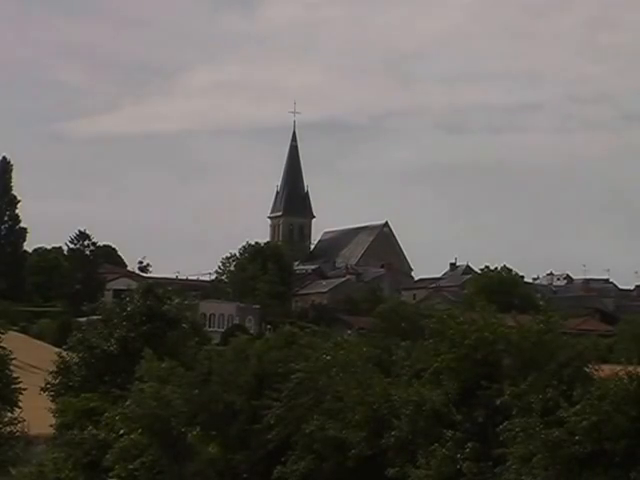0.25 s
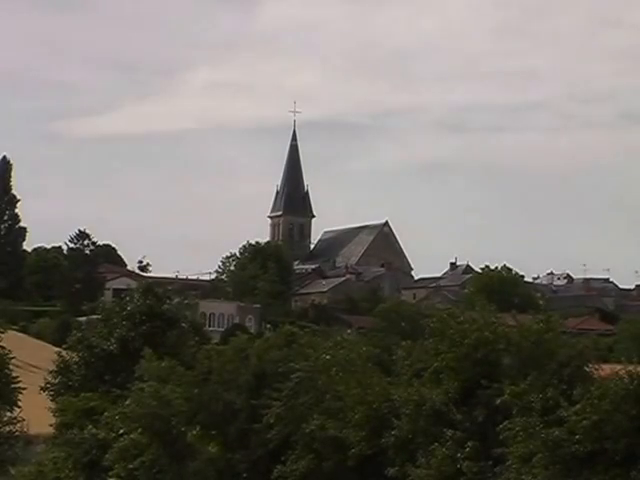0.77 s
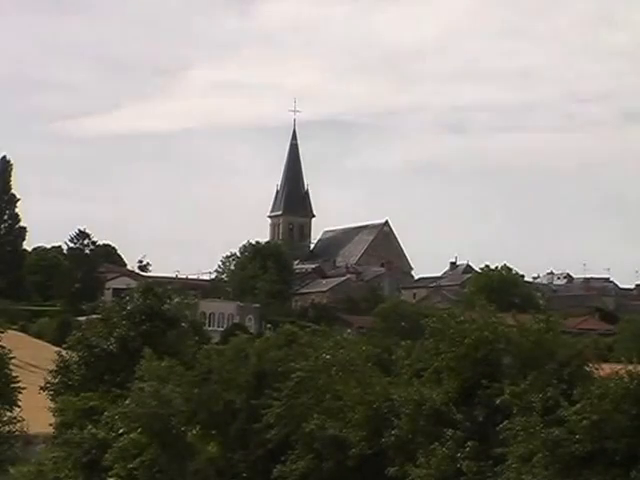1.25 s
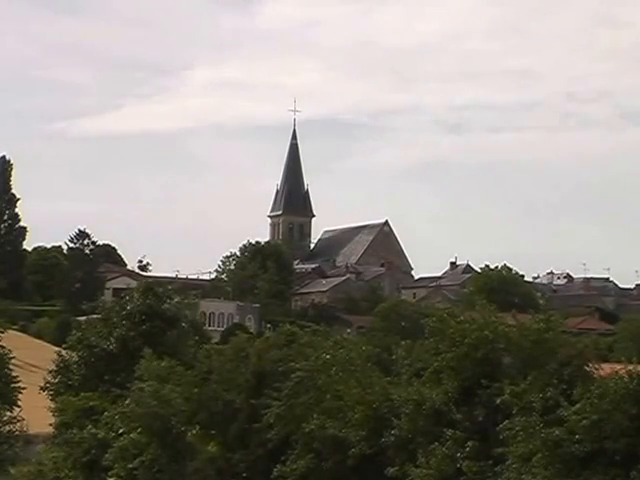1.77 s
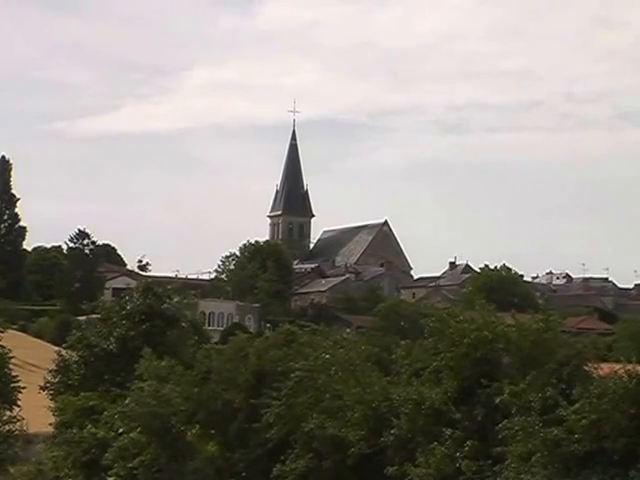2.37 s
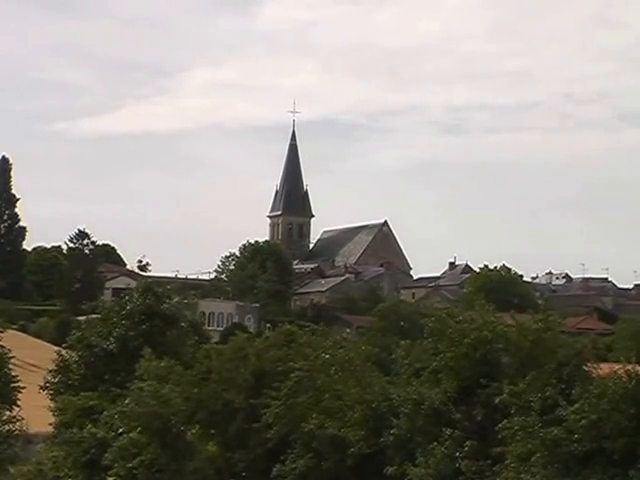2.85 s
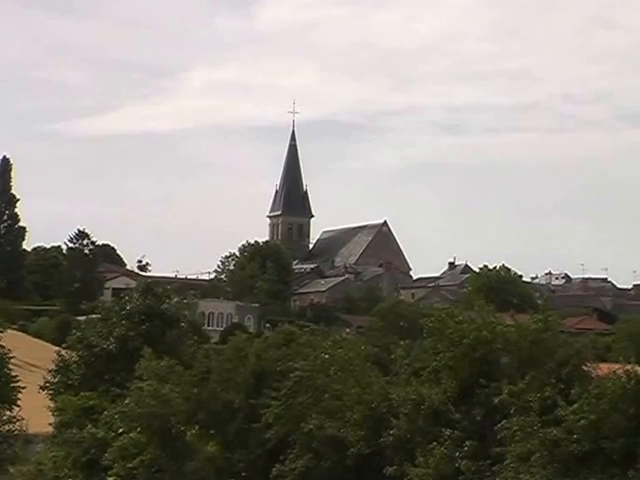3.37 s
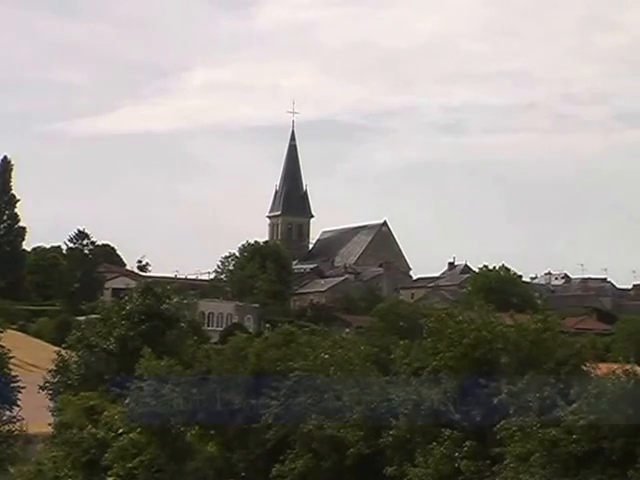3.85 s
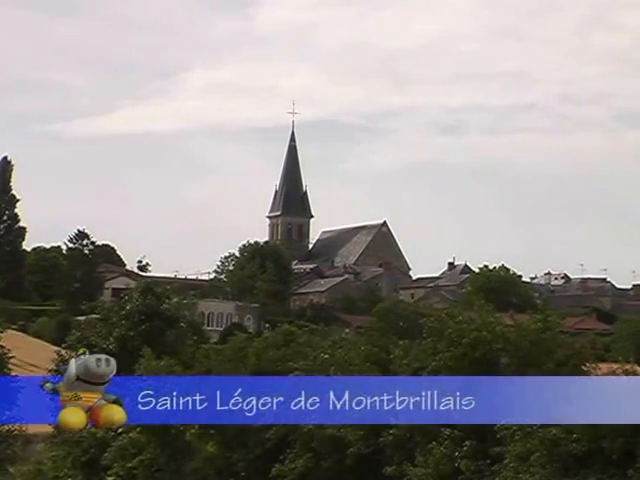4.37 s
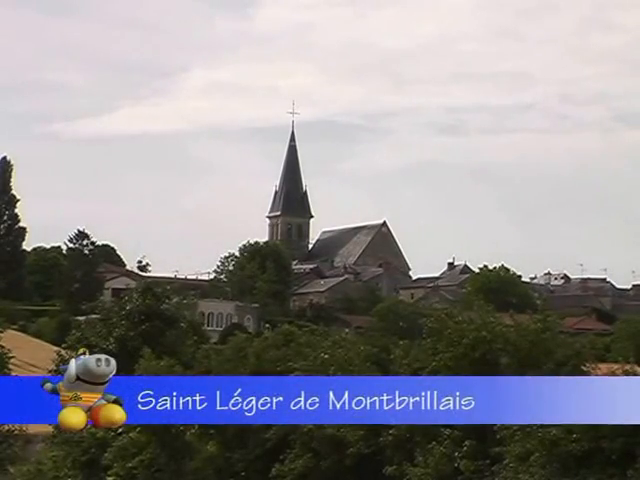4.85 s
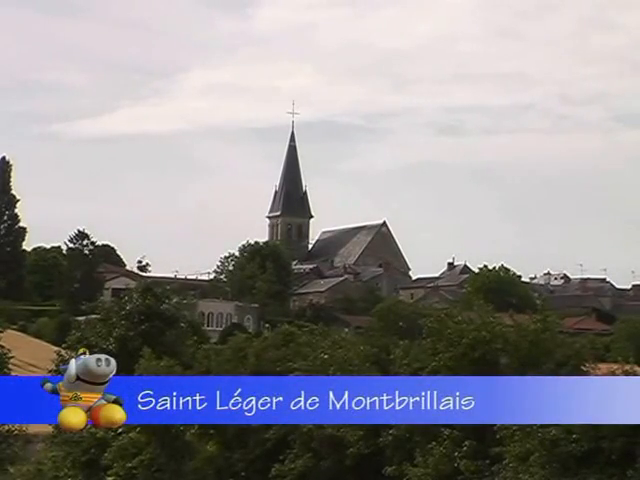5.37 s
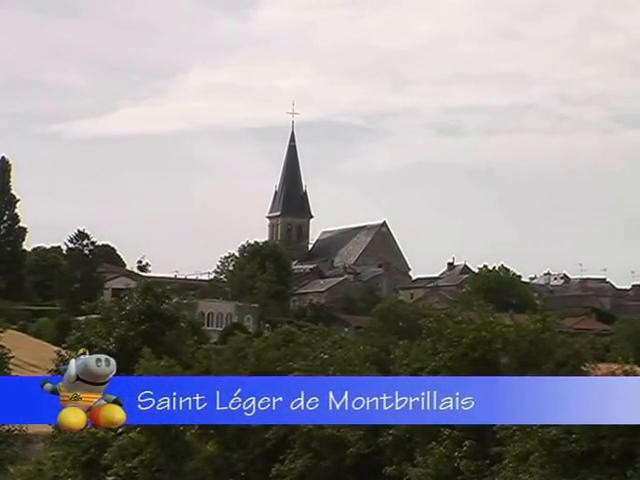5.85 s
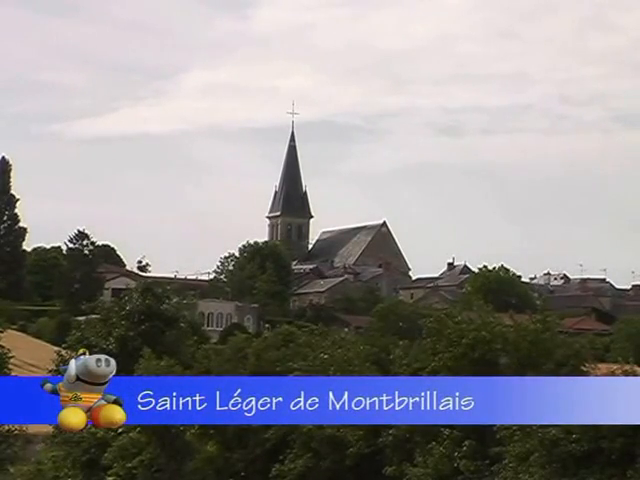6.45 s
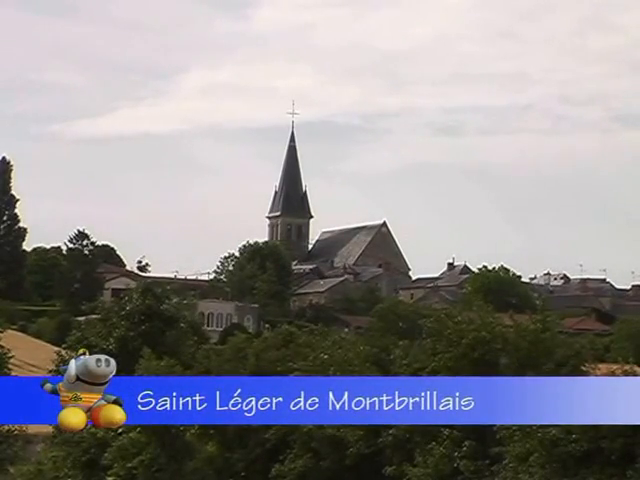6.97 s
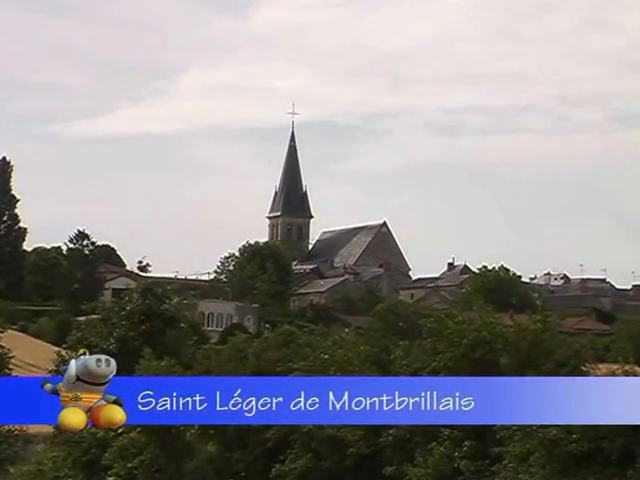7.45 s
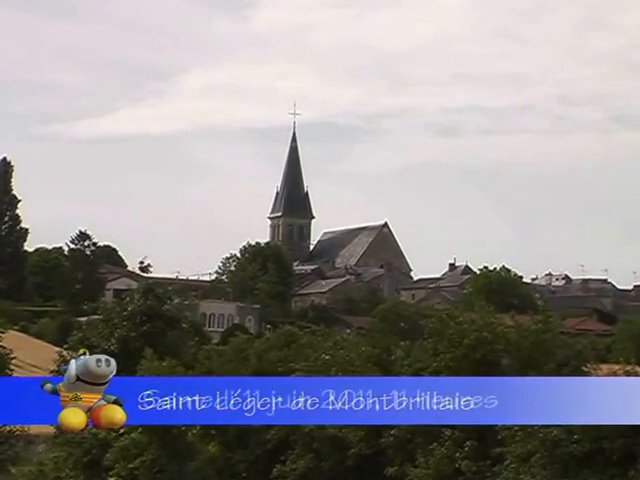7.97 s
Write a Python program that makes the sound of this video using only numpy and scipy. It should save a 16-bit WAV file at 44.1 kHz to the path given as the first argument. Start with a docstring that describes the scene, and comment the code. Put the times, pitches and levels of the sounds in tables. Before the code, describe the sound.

The first 0.65 seconds are silent, then an extremely faint, steady hiss appears. At about 0.9 seconds a distant church clock bell is struck, followed by identical blows near 2.2, 3.5, 4.9, 6.2 and 7.6 seconds, all on the same note and equally loud. Each stroke blooms within a few hundredths of a second into a dense, slightly rough metallic clang, strongest in the middle range around 900 to 1150 hertz, with weaker shimmering overtones above. The ring holds for roughly half a second, beating and wavering across a wide stereo image, with a slight echo returning after nearly half a second. Treble dies first; a quiet low hum lingers. Each tail is still sounding when the next blow covers it, and the last is still ringing as the sound ends. The space is open air above village roofs, reverberant and distant.

```python
"""Over the roofs of a village, a church bell sounds six times, about every 1.35 s, the same blow each time.
Each blow is the same sum of decaying sines: split partials beat, swell in the reverberant air and come back
once as an echo; weak overtones shimmer around them. Coloured noise with frequency-dependent decay makes the
clang; a low partial lingers as a hum. Faint steady noise is the hiss beneath."""
import sys
import numpy as np
from scipy import signal
from scipy.fft import rfft, irfft, next_fast_len
from scipy.io import wavfile

SR = 44100
rng = np.random.default_rng(int(sys.argv[2]) if len(sys.argv) > 2 else 0)


def bounce(signal):
    """Save signal as a 16-bit WAV file at the path given by the first command-line argument."""
    frames = np.transpose(np.atleast_2d(signal))
    limited = np.clip(frames, -1, 1)
    pcm = np.round(limited * 32767).astype(np.int16)
    wavfile.write(sys.argv[1], SR, pcm)


N = 361619

# hammer blows, all equally strong: start_s
STROKE_STARTS_S = [.867, 2.199, 3.549, 4.895, 6.249, 7.597]
# background hiss colour: freq_hz, relative_level_db_per_hz
AIR_COLOUR = [(25, 20), (100, 13), (300, 5), (1000, 6), (3000, 3.5), (8000, 5.5), (13000, 5.5)]
# diffuse clang between the partials: freq_hz, relative_level_db_per_hz, t60_s
CLANG_BANDS = [(22.4, -6.5, 10), (36.2, -13, 8.8), (57.6, -10, 11), (110, -22, 3.2), (176, -13.5, 8.5),
               (266, -16, 3.2), (442, -5.5, 2.93), (647, -10, 1.79), (1047, 0.5, 1.39), (1900, -13, 1.18),
               (2080, -10.5, 1.27), (3200, -20, 1.32), (4330, -28, 1.61), (9200, -31, 1.2),
               (13700, -35, 1.1)]
# weak partials: pitch_hz, level_db, t60_s
WEAK_PARTIALS = [(150, -50, 1.6), (625, -52, 1.9), (792, -39.5, 1.1), (1146.6, -25.5, 1.36),
                 (1303, -35.5, 0.22), (1403, -48.5, 0.92), (1530, -40.5, 1.4), (1680, -44.5, 2.8),
                 (1904, -43, 1.68), (2181, -39.5, 0.89), (2495, -53, 2.8), (3085, -48.5, 2.1),
                 (3104, -45.5, 1.58), (3214, -42.5, 1.55), (3660, -54.5, 2.2), (4220, -54.5, 1.3)]
# strong partials, each with a twin mode close by: pitch_hz, level_db, left_minus_right_db, left_lead_rad,
# swell_s, hold_s, t60_s, echo_share, twin_offset_hz, twin_share, twin_left_lead_rad (extra)
# shares are amplitude ratios; a negative share opposes the partial
STRONG_PARTIALS = [(183.5, -42.5, 0.1, 3.5, 0.0084, 0.96, 5.7, 0.22, 1.75, 0.47, 2.0),
                   (382.3, -33, -6.5, -1.7, 0.072, 0.57, 2.13, -0.19, -3.5, 0.23, 2),
                   (454.5, -30, 8.5, 3, 0.078, 0.81, 0.95, 0.63, 2.04, 0.59, -1.98),
                   (761.3, -28.5, 5, 1.79, 0.0059, 0.54, 1.93, 0.17, 1, -0.45, 1),
                   (928.25, -18, 2.5, -2.08, 0.076, 0.23, 1.6, -0.42, 5, 0.63, -2.5),
                   (998, -30.5, 3.5, 2, 0.023, 0.72, 1.04, 0.47, -2.7, 0.54, -1.9),
                   (1092.7, -30.5, 4.5, 1.4, 0.0067, 0.39, 1.15, 0.4, 0, -0.24, 0.4),
                   (1147, -20.5, 3.5, 2, 0.072, 0.5, 1.21, -0.98, -2.3, -0.34, -0.35),
                   (1582.6, -31.5, 1.5, -0.34, 0.028, 0.65, 1.62, -0.88, 1.04, 0.49, 2.04),
                   (2061.5, -32.5, 1.8, -1.8, 0.11, 0.56, 1.22, 0.0028, 4.5, 0.55, 0.1),
                   (2157, -35.5, 4.5, -0.5, 0.026, 0.079, 1.7, -0.24, -7.5, 0.91, -4.5),
                   (2575, -39, 4, -1.65, 0.017, 0.38, 1.33, 0.084, 3, -0.18, -1.28)]

AIR_DB, AIR_START_S = -65.5, .65
CLANG_DB, CLANG_SWELL_S, CLANG_HOLD_S = -28.5, 0.026, 0.43
CLANG_EASE = 1.21  # exponent; above 1 the wash starts gently
OVERTONE_HOLD_AT_1KHZ_S, HOLD_SLOPE = 0.34, 0.38  # lower tones hold longer
ECHO_DELAY_S, ECHO_RISE_S = .460, .005
SCATTER_FROM_HZ = 770  # longer waves pass round obstacles and waver less
ONSET_DB, ONSET_S = -46, 0.011
TOP_HZ = 13500
SIDES = np.array([[1], [-1]])  # left, right
RING_S = np.arange(2 * SR) / SR  # time since the blow, every sample
SLOW_S = np.linspace(0, 2, 600)  # same span, coarse grid for envelopes


def undb(db):
    """Decibels to gain."""
    return 10 ** (np.asarray(db) / 20)


def along(hz, points_hz, values):
    """Straight lines between points on a log-frequency axis."""
    return np.interp(np.log(np.maximum(hz, 1)), np.log(points_hz), values)


def fade(t_s, t60_s):
    """Exponential decay from t = 0, down 60 dB after t60."""
    return np.exp(-np.log(1000) * np.maximum(t_s, 0) / t60_s)


def envelope(swell_s, hold_s, t60_s, delay_s=0):
    """Sound builds up as reflections gather, stays a while, then dies away."""
    t_s = np.maximum(SLOW_S - delay_s, 0)
    build_up = 1 - np.exp(-t_s / swell_s)
    return build_up * fade(t_s - hold_s, t60_s)


def noise(size, points_hz, db, ripple_db=0):
    """Unrelated left and right noise of a given colour, rms 1; reflections comb it with peaks and valleys."""
    order = next_fast_len(size, True)
    hz = np.arange(order // 2 + 1) * SR / order
    comb_hz = np.arange(0, SR / 2, 20)
    ripple = np.clip(rng.standard_normal(len(comb_hz)), -2, 1)
    ripple = ripple * comb_hz / (comb_hz + 1500)  # shallower in the bass
    colour = undb(along(hz, points_hz, db) + ripple_db * np.interp(hz, comb_hz, ripple))
    white = rng.standard_normal((2, order))
    coloured = irfft(rfft(white) * colour, order)[:, :size]
    return coloured / coloured.std()


def scatter(width_hz):
    """Many paths add at random: a slow complex flutter for each ear, rms 1."""
    shape = (2, len(SLOW_S))
    white = rng.standard_normal(shape) + 1j * rng.standard_normal(shape)
    b, a = signal.butter(2, width_hz, fs=1 / SLOW_S[1])
    flutter = signal.lfilter(b, a, white)
    return flutter / flutter.std()


def tone(hz, swing):
    """A sine for each ear whose rms size and phase follow a slow complex envelope."""
    carrier = np.sqrt(2) * np.exp(2j * np.pi * hz * RING_S)
    return np.array([(np.interp(RING_S, SLOW_S, ear) * carrier).real for ear in swing])


def air():
    """Faint coloured noise that sets in shortly before the first blow, then stays steady."""
    points_hz, db = np.transpose(AIR_COLOUR)
    started = np.arange(N) / SR > AIR_START_S
    return undb(AIR_DB) * noise(N, points_hz, db) * started


def clang():
    """The crash of the hammer, smeared into a reverberant wash whose treble dies first."""
    points_hz, db, t60_s = np.transpose(CLANG_BANDS)
    wash = noise(len(RING_S), points_hz, db, ripple_db=4.5)
    hz, t_s, bands = signal.stft(wash, SR, nperseg=1024)
    band_t60_s = along(hz, points_hz, t60_s)[:, None]
    bands = bands * fade(t_s - CLANG_HOLD_S, band_t60_s)
    wash = signal.istft(bands, SR)[1][:, :len(RING_S)]
    swell = (1 - np.exp(-RING_S / CLANG_SWELL_S)) ** CLANG_EASE
    return undb(CLANG_DB) * wash * swell


def overtones(swell_s=0.015, steady=0.54, flutter=0.69, flutter_hz=7):
    """Weak partials brighten the blow and shimmer among the reflections."""
    direct = steady * np.array([[1], [1j]])  # a quarter turn between the ears: wide, not centred
    out = 0
    for hz, db, t60_s in WEAK_PARTIALS:
        hold_s = OVERTONE_HOLD_AT_1KHZ_S * (1000 / hz) ** HOLD_SLOPE
        shimmer = direct + flutter * scatter(flutter_hz)
        out = out + tone(hz, undb(db) * envelope(swell_s, hold_s, t60_s) * shimmer)
    return out


def partials(flutter=0.33, tail_flutter=0.82, flutter_hz=7):
    """The bell is not quite round, so partials beat slowly against their twins; an echo returns once."""
    out = 0
    for (hz, db, pan_db, lead_rad, swell_s, hold_s, t60_s,
         echo_share, twin_hz, twin_share, twin_lead_rad) in STRONG_PARTIALS:
        # the twin radiates in another direction, so each beat reaches the ears at different moments
        twin_rad = 2 * np.pi * twin_hz * SLOW_S + SIDES * twin_lead_rad
        beat = 1 + twin_share * np.exp(1j * twin_rad)
        place = undb(SIDES * pan_db / 2) * np.exp(.5j * SIDES * lead_rad)
        # as the tone dies, scattered reflections take over and make it waver
        late = np.clip((SLOW_S - hold_s) * 2, 0, 1)
        depth = (flutter + (tail_flutter - flutter) * late) * min(1, hz / SCATTER_FROM_HZ)
        wander = depth * scatter(flutter_hz)
        direct = beat * place * (1 - late * tail_flutter / 2)
        ring = envelope(swell_s, hold_s, t60_s) * (direct + wander)
        # the echo reaches both ears alike
        echo = echo_share * envelope(ECHO_RISE_S, 0, t60_s, delay_s=ECHO_DELAY_S)
        out = out + tone(hz, undb(db) * (ring + echo))
    return out


def bell_stroke():
    """One hammer blow: tones that start weak before strong reflections follow, plus the clang."""
    onset = undb(ONSET_DB * np.exp(-RING_S / ONSET_S))
    stroke = clang() + (overtones() + partials()) * onset
    # the last half second fades out under the next blow
    return stroke * np.minimum(1, 2 * (RING_S[-1] - RING_S))


def scene():
    """The same blow falls six times over hiss, each over the dying ring of the one before."""
    out = air()
    stroke = bell_stroke()
    for start_s in STROKE_STARTS_S:
        start = int(start_s * SR)
        part = stroke[:, :N - start]
        out[:, start:start + part.shape[1]] += part
    return out


def record(dry):
    """A steep elliptic low-pass cuts the top."""
    low_pass = signal.ellip(10, .2, 80, TOP_HZ, fs=SR, output="sos")
    return signal.sosfilt(low_pass, dry)


dry = scene()
out = record(dry)
bounce(out)
```